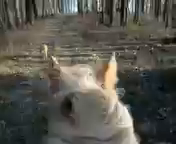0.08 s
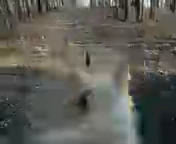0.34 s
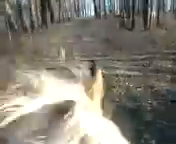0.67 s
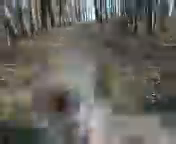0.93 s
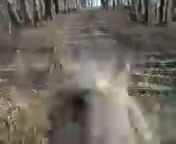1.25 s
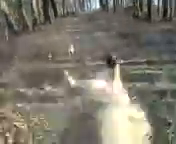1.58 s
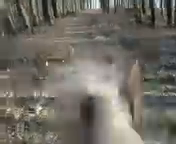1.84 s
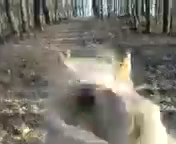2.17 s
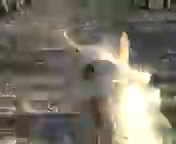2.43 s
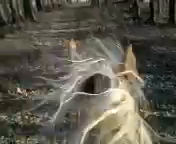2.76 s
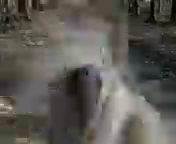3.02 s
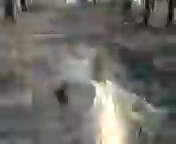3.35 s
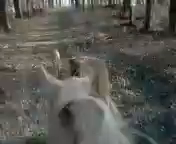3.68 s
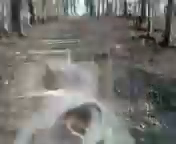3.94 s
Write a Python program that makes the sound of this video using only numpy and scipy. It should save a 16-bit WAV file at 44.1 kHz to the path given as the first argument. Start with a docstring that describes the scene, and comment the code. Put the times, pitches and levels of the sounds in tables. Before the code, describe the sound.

A small bell jingles with every stride of a horse moving briskly along a woodland trail, heard from the saddle. Hooves crunch dry leaves and snap a few twigs, while wind buffets the microphone hard at first, then eases.

```python
"""A horse moves briskly along a woodland trail of dry leaves, heard from the saddle.
A gust buffets the small microphone from the start and overloads it, while a pellet bell on the tack
jingles with every stride. Hooves come in crunching the leaves, and now and then a twig snaps.
The wind eases into weaker gusts and dull thumps as the bell and hooves carry on."""
import sys
import numpy as np
from scipy import signal
from scipy.fft import rfft, irfft
from scipy.io import wavfile
from scipy.ndimage import uniform_filter1d, map_coordinates

SR = 44100
rng = np.random.default_rng(int(sys.argv[2]) if len(sys.argv) > 2 else 0)


def materialize(psi):
    """Save the field psi as 16-bit PCM at rate SR to the path in sys.argv[1].

    A 1-D psi becomes a single channel; in a 2-D psi each row is a channel.
    """
    bounded = np.clip(np.atleast_2d(psi).T, -1, 1)
    quanta = np.round(bounded * 32767).astype(np.int16)
    wavfile.write(sys.argv[1], SR, quanta)


N = 176400
T = np.arange(N) / SR

# tone of crushed leaves and twigs (frequency [Hz], relative level [dB])
LEAF_SPECTRUM = [(200, -5), (700, 2.5), (1900, 0.5), (4200, 5), (5600, 1), (7000, -5.5), (8600, -26)]


def undb(db):
    """Decibels to gain."""
    return 10 ** (np.asarray(db) / 20)


def unit(x):
    """Scale to rms 1."""
    return x / np.sqrt(np.mean(x ** 2))


def fade(t, t60):
    """Decay by 60 dB in t60 seconds."""
    return np.exp(-np.log(1000) * t / t60)


def wander(per_s):
    """Smooth random drift with rms 1."""
    hold = int(SR / per_s)
    stairs = np.repeat(rng.standard_normal(N // hold + 1), hold)
    return unit(uniform_filter1d(uniform_filter1d(stairs, hold), hold)[:N])


def colour(x, spectrum):
    """EQ by (Hz, dB) points on a log-frequency axis, keeping the power of white noise."""
    hz, db = np.array(spectrum).T
    curve_db = np.interp(np.log(np.fft.rfftfreq(N, 1 / SR) + 1), np.log(hz), db)
    return irfft(rfft(x) * unit(undb(curve_db)), N)


def add(out, start_s, x):
    """Mix a sound in at a time."""
    i = max(int(start_s * SR), 0)
    out[i:i + len(x)] += x[:max(N - i, 0)]


def wind():
    """Eddies at the microphone: a stronger gust is louder and brighter; buffets thump in the bass."""
    # strength of the wind (time [s], level [dB])
    gusts = [(0, -12), (.17, -9), (.3, -14), (.54, -13), (.68, -19.5), (.97, -15), (1.13, -34), (1.4, -28),
             (1.68, -19), (1.94, -29), (2.4, -31), (2.72, -21.5), (3.0, -33.5), (3.15, -31.5),
             (3.28, -42.5), (3.6, -39), (3.8, -38.5), (4.0, -27)]
    # short buffets on top of it (time [s], half length [s], boost [dB])
    buffets = [(1.193, 0.0052, 20), (2.043, 0.019, 14.5), (2.584, 0.012, 10.5), (2.955, 0.026, 9),
               (3.494, 0.03, 19), (3.7, 0.017, 14.5)]
    # tone of the wind at the reference strength (frequency [Hz], relative level [dB])
    wind_spectrum = [(20, -8.5), (45, -2), (170, 1.5), (280, 0), (420, -7), (650, -17), (1000, -32.5),
                     (2000, -54.5)]
    level_db, reference_db, thump_hz, thump_octaves = -18, -21.5, 202, 2.5
    brightening = 0.46  # extra dB per dB of gust and per octave above 250 Hz
    gust_db = np.interp(T, *np.array(gusts).T) - reference_db
    buffet_db = sum(db * np.exp(-((T - at) / half) ** 2) for at, half, db in buffets)
    eddies = colour(rng.standard_normal(N), wind_spectrum) * undb(4 * wander(per_s=130))
    eddies /= np.sqrt(uniform_filter1d(eddies ** 2, int(0.06 * SR)))  # keep only the fast flutter
    eddy_bins = rfft(eddies)
    bin_octave = np.log2((np.fft.rfftfreq(N, 1 / SR) + 1) / 250)
    out = np.zeros(N)
    for octave in range(-4, 4):
        band = irfft(eddy_bins * np.maximum(1 - abs(bin_octave - octave), 0), N)
        thump_share = np.exp(-(np.log2(250 * 2. ** octave / thump_hz) / thump_octaves) ** 2)
        swell_db = gust_db * (1 + brightening * np.clip(octave, -1, 2))
        out += band * undb(level_db + swell_db + thump_share * buffet_db)
    return out


def bell():
    """A pellet strikes the shell and skitters; it rings until the next strike or the coat chokes it."""
    # pellet strikes, with a level for each mode group
    # (time [s], 2.1 kHz pair [dB], 4.9 kHz group [dB], 5.6 kHz mode [dB], top modes [dB])
    strikes = [(0.0004, -26, -33, -34, -54), (0.2798, -13, -36, -34, -46), (0.2997, -14, -32, -42, -48.5),
               (0.3765, -17, -28.5, -30.5, -46.5), (0.5521, -20.5, -38, -60, -55),
               (0.6714, -24, -32.5, -36, -50), (0.7472, -13.5, -37, -41, -53),
               (0.7894, -27, -30.5, -34, -44), (0.9716, -25, -31.5, -37, -49),
               (1.066, -19.5, -25.5, -31, -48), (1.1094, -15, -23, -29, -58),
               (1.1278, -19.5, -24.5, -31.5, -40), (1.3788, -18.5, -39, -26, -42),
               (1.4057, -17, -23.5, -30, -31.5), (1.5359, -11.5, -37, -29, -44),
               (1.5614, -29, -31.5, -38, -43), (1.708, -36, -27.5, -38, -63),
               (1.7958, -15.5, -31.5, -32, -45.5), (1.924, -20, -35.5, -25.5, -50),
               (2.125, -28.5, -46, -37.5, -60), (2.2214, -38, -37.5, -24.5, -50),
               (2.2428, -23.5, -28, -28.5, -51.5), (2.357, -17.5, -34, -45, -62),
               (2.3895, -8.5, -29, -37, -44), (2.429, -14.5, -33, -23.5, -41),
               (2.5394, -38.5, -32, -28, -55), (2.6289, -19.5, -37, -32.5, -56),
               (2.7382, -17, -32, -27.5, -41.5), (2.9236, -20.5, -30.5, -30, -47),
               (3.044, -14.5, -29, -20.5, -45.5), (3.1857, -21, -36.5, -27, -53),
               (3.4555, -30.5, -27.5, -29, -49), (3.5573, -20, -36, -35, -48),
               (3.6024, -23, -36, -34.5, -54), (3.752, -29, -39, -40, -56.5),
               (3.8834, -17, -30, -19, -42.5), (3.9075, -15, -34, -20.5, -45.5)]
    # shell modes, one list a group; close pairs beat (frequency [Hz], relative level [dB])
    mode_groups = [
        [(2140, -2), (2062, -10)],
        [(4663, -9), (4866, -6), (4935, -3)],
        [(5622, 0)],
        [(7617, -8), (7685, 2.5), (8316, -4)],
    ]
    # free ring of each group (decay time by 60 dB [s])
    ring_times = [0.6, 0.8, 0.85, 0.9]
    # the bell swings against the horse's coat (time [s])
    chokes = [0.016, 0.763, 0.813, 0.99, 1.305, 1.55, 1.584, 2.051, 2.396, 2.447, 2.66, 2.954, 3.231]
    rise_s, touch_s, choke_t60_s, choke_floor_db = 0.001, 0.0059, 0.098, -18.5
    skitter_per_s, skitter_db, skitter_s, muted_t60_s = 48, -4.5, 0.25, 0.082
    groups = np.zeros((len(mode_groups), N))
    next_starts = [row[0] for row in strikes[1:]] + [N / SR]
    t = T[:SR // 2]
    for (start, *levels), next_start in zip(strikes, next_starts):
        choke = min([at for at in chokes if at > start] + [N / SR])
        envelope = np.maximum(fade(np.maximum(start + t - choke, 0), choke_t60_s), undb(choke_floor_db))
        envelope *= np.exp(-np.maximum(start + t - next_start, 0) / touch_s)
        envelope *= 1 - np.exp(-t / rise_s)
        taps = (rng.random(len(t)) < skitter_per_s / SR) * rng.choice([-1, 1], len(t))
        skitter = taps * undb(skitter_db) * np.exp(-t / skitter_s)
        for group, modes, level_db, t60 in zip(groups, mode_groups, levels, ring_times):
            for hz, db in modes:
                free = np.exp(2j * np.pi * hz * t) * fade(t, t60)
                pole = np.exp(2j * np.pi * hz / SR) * fade(1 / SR, muted_t60_s)
                muted = signal.lfilter([1], [1, -pole], skitter)  # the pellet damps what it rings
                ring = envelope * (free + muted).imag
                add(group, start, undb(level_db + db) * ring * rng.choice([-1, 1]))
    return sum(swing(group) for group in groups)


def swing(ring):
    """The tumbling bell wavers in pitch and turns its modes towards and away from the microphone."""
    pitch_share, sway_db = 0.0008, 1.78
    position = np.arange(N) + np.cumsum(pitch_share * wander(per_s=14))
    wavering = map_coordinates(ring, [position], mode="nearest")
    return wavering * undb(sway_db * wander(per_s=35))


def leaf_crackle():
    """Dense tiny fractures of dry leaves, most small and a few large."""
    grains_per_s, scatter_db = 4000, 3
    sizes = undb(scatter_db * np.minimum(rng.exponential(size=N), 2 * np.pi))
    grains = (rng.random(N) < grains_per_s / SR) * sizes * rng.choice([-1, 1], N)
    return unit(colour(grains, LEAF_SPECTRUM))


def hooves():
    """Each footfall crushes leaves for a moment; a finer rustle swells and sinks with the stride."""
    # footfalls in dry leaves (time [s], length [s], level [dB])
    steps = [(0.255, 0.043, -31), (0.608, 0.056, -24), (0.784, 0.041, -34.5), (1.03, 0.032, -28),
             (1.422, 0.049, -25), (1.668, 0.083, -36), (1.803, 0.098, -31.5), (2.102, 0.025, -34.5),
             (2.28, 0.064, -33), (2.491, 0.041, -34), (2.606, 0.026, -27), (2.66, 0.097, -30.5),
             (2.892, 0.025, -32), (3.025, 0.065, -33), (3.352, 0.026, -37), (3.414, 0.082, -31),
             (3.499, 0.045, -27.5), (3.93, .07, -40)]
    attack_s, release_s, rustle_db, swell_db = 0.0071, 0.015, -40, 1.5
    stride_hz, lull_s = 2.465, 0.03  # at the lull all hooves are clear of the leaves
    pressure = np.zeros(N)
    for start, length, db in steps:
        attack = np.clip((T - start) / attack_s, 0, 1)
        release = np.exp(-np.maximum(T - start - length, 0) / release_s)
        pressure += undb(db) * attack * release
    crunch = pressure * leaf_crackle()
    rustle = unit(leaf_crackle() + colour(rng.standard_normal(N), LEAF_SPECTRUM))
    stride = -np.cos(2 * np.pi * stride_hz * (T - lull_s))
    return crunch + undb(rustle_db + swell_db * stride) * rustle


def twigs():
    """A twig breaks under a hoof: a sharp crack and a very short woody ring."""
    # twig snaps (time [s], relative level [dB])
    snaps = [(0.621, -9), (1.076, -10.5), (1.739, -16), (1.8436, 0.5), (2.669, -10), (3.082, -18)]
    crack_s, ring_hz, ring_s, ring_db = 0.001, 4170, 0.0035, -14
    out, t = np.zeros(N), T[:SR // 20]
    ring = undb(ring_db) * np.sin(2 * np.pi * ring_hz * t) * np.exp(-t / ring_s)
    for start, db in snaps:
        crack = rng.standard_normal(len(t)) * np.exp(-t / crack_s)
        add(out, start, 0.5 * undb(db) * (crack + ring))
    return colour(out, LEAF_SPECTRUM)


def scene():
    """Bell, leaves, twigs and wind at one microphone."""
    return (bell() + hooves() + twigs() + wind())[None]


def record(dry):
    """The microphone flattens the highest peaks and the recorder cuts the top."""
    ceiling, knee, top_hz = 0.7, 20, 8700
    clipped = dry / (0.5 + abs(dry / ceiling) ** knee) ** (1 / knee)
    return signal.sosfilt(signal.ellip(8, .3, 65, top_hz, fs=SR, output="sos"), clipped)


dry = scene()
out = record(dry)
materialize(out)
```